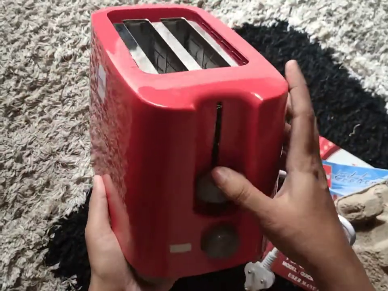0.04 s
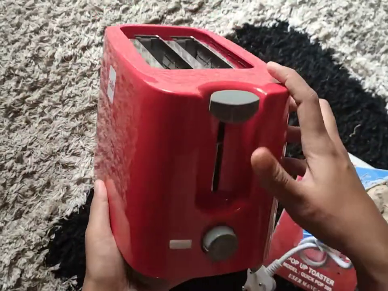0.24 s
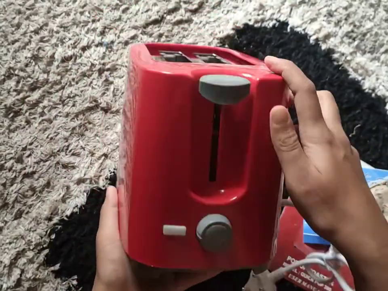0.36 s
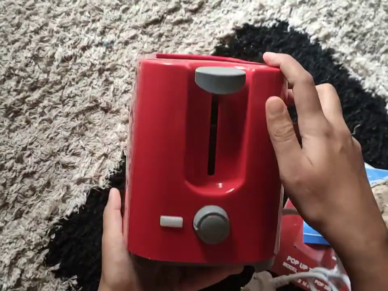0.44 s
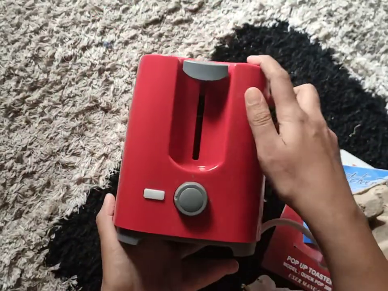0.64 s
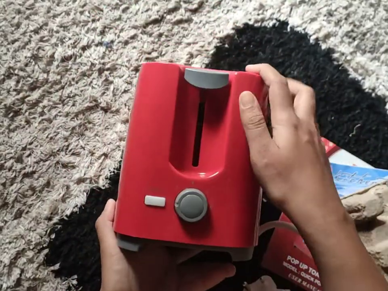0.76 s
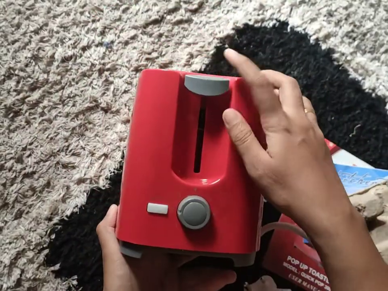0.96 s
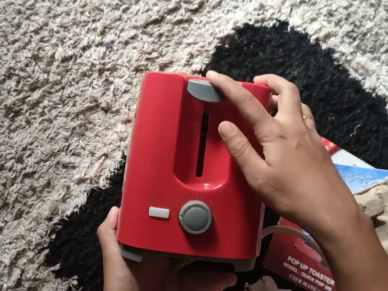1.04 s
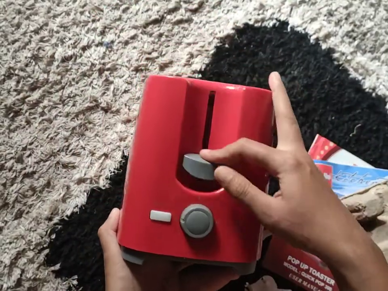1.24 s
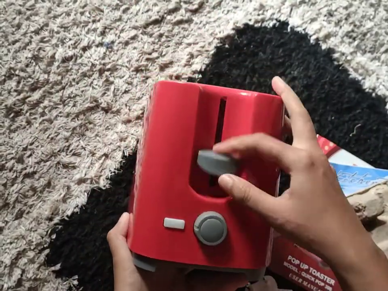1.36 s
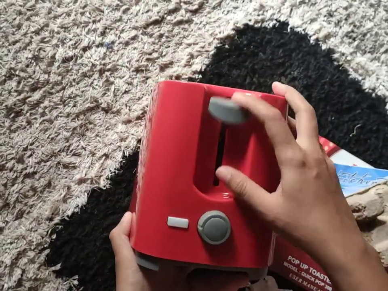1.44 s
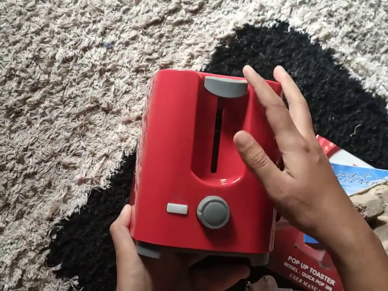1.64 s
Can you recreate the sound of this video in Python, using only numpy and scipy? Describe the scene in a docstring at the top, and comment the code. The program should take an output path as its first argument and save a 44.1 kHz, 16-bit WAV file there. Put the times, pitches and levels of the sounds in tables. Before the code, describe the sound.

A toaster lever snaps up with a sharp clack, then is pushed down with lighter clicks.

```python
"""In a small room, a plastic toaster is handled close by while a fan murmurs in the background.
Its sprung lever is let go and slams into the top stop, is tapped, pushed down onto the steel latch,
and eased back up. Each impact excites the damped modes of the lever, the housing and the steel cage.
Between the stops, friction makes the carriage scrape along its guide and the lever squeak."""
import sys
import numpy as np
from scipy import signal
from scipy.fft import rfft, irfft, next_fast_len
from scipy.io import wavfile
from scipy.ndimage import uniform_filter1d, map_coordinates

SR = 44100
rng = np.random.default_rng(int(sys.argv[2]) if len(sys.argv) > 2 else 0)


def log_audio(samples):
    """Write samples as a 16-bit WAV file to the path given in sys.argv[1]."""
    # one column per channel
    frames = np.atleast_2d(samples).T
    # limit to full scale, then quantise
    limited = np.clip(frames, -1, 1)
    pcm = np.round(limited * 32767).astype(np.int16)
    wavfile.write(sys.argv[1], SR, pcm)


N = 74970

# likeness of left and right (frequency [Hz], correlation [1])
CORRELATION = [(40, 0.13), (130, 0.92), (300, 0.96), (700, 0.78), (1000, 0.46), (1400, 0.066),
               (2500, 0.025), (12000, 0.016)]
# colouring of the two sides (frequency [Hz], left minus right [dB])
BALANCE = [(100, -4), (500, 2), (1200, 0), (2400, -3.5), (4400, -2.5), (6300, -2), (8200, 8), (10500, 10.5),
           (14000, -1)]
# reverberation of the room (frequency [Hz], T60 [s])
ROOM_DECAY = [(150, 0.13), (500, 0.65), (1100, 0.48), (2800, 0.42), (8000, 0.33), (15000, 0.38)]
# tones of the fan (frequency [Hz], level [dB])
FAN_TONES = [(272, -68), (828, -68), (2019, -75)]
# spectra of room air, sliding and impact (frequency [Hz], relative spectral level [dB])
AIR_SPECTRUM = [(15, -81), (25, -19), (75, -19.5), (136, -20.5), (148, -15), (274, -1), (359, -8),
                (445, -9.5), (495, -10.5), (537, -13), (666, -11.5), (826, -8), (1200, -17.5),
                (1300, -12.5), (1900, -17.5), (2230, -13), (2560, -16.5), (2770, -16.5), (4150, -18.5),
                (5730, -23), (9050, -28), (10100, -35.5), (15500, -40.5)]
STEEL_SCRAPE = [(200, -9.5), (1000, -40), (2500, -6), (5600, 2.5), (6900, -8), (8700, 2.5), (9500, -10.5),
                (13000, -11.5), (15000, -10)]
SHELL_RUB = [(100, -66), (280, -0.5), (650, -2), (950, -0.5), (1450, -2.5), (1900, 2), (2700, -1),
             (6000, -15.5), (15000, -51)]
PLASTIC_KNOCK = [(40, -32), (110, -27), (230, -0.5), (400, -3), (480, -1), (570, -3), (690, -8),
                 (1000, -2.5), (1400, -7), (2200, 1.5), (2900, -13), (4000, -8), (5100, -8.5), (9000, -29),
                 (15000, -41)]
STEEL_CLASH = [(200, -23), (1000, -7), (2300, 3), (3300, -0.5), (5500, 5), (7300, 1.5), (8800, 4.5),
               (9500, -5), (12000, -5.5), (15300, -8)]
# modes of guide rod, latch, lever and housing (frequency [Hz], relative level [dB], T60 [s])
GUIDE_MODES = [(915, -6.5, 0.033), (2033, -7, 0.024), (3850, 0, 0.018), (4270, -0.5, 0.015),
               (5420, 1.5, .01), (8570, -8, 0.026)]
LATCH_MODES = [(430, -4, 0.028), (1210, -9, .015), (1610, -4.5, 0.025), (2000, 3, 0.027),
               (2387, -0.5, 0.042), (3280, -7, 0.018), (4420, -19, 0.19), (6400, -8.5, 0.19),
               (8425, -10.5, 0.23), (11213, -10.5, 0.19)]
LEVER_MODES = [(967, -1.5, 0.05), (1083, -1.5, 0.022), (1960, 0.5, 0.017), (2304, 1.5, 0.021)]
HOUSING_MODES = [(204, -32, .1), (285.9, -11.5, 0.27), (406, -18, 0.13), (516.6, -14, 0.24),
                 (568, -7, 0.21), (601.6, -8, 0.16), (894, -7.5, 0.18), (928, -9, 0.23), (1004, -14, 0.16),
                 (1077, -16, 0.14), (1368, -11.5, 0.38), (1627, -15, 0.062), (1778, -17, 0.18),
                 (1925, -11, 0.13), (2170, -11.5, 0.14), (2254, -14, 0.24)]
# modes of the steel cage (frequency [Hz], relative level [dB])
CAGE_MODES = [(2012, -3), (2430, -17), (3074, -2.5), (3537, -4), (4148, -7), (4581, -7), (5112, -7),
              (5733, -5.5), (6045, 0), (6217, -3), (7135, -5), (7429, -8), (7946, -12), (8360, -1.5),
              (8800, 0), (10130, -11), (11780, -8), (12973, -4), (13180, -12), (14553, 2), (15180, -1)]
# squeaks of the pressed lever (centre time [s], half-length [s], frequency [Hz], level [dB])
LEVER_SQUEAKS = [(1.19, 0.055, 956, -54), (1.205, 0.031, 1165, -55), (1.251, 0.022, 955, -45),
                 (1.266, 0.032, 1182, -51), (1.255, .005, 1880, -39), (1.276, 0.01, 1897, -41)]
# strokes of the carriage and brushes of the hand
# (time [s], length [s], scrape [dB], swell [dB], rub [dB], ticks [dB], left minus right [dB])
SLIDES = [(0.0, 0.023, -38.5, -9, -43.5, -61, 0), (0.014, 0.079, -56, -4.5, -58, -61, 4),
          (0.154, 0.08, -49, 8.5, -58.5, -63, -3.5), (0.798, 0.038, -59, -7.5, -55.5, -69, -5),
          (1.002, .03, -58, -11, -50, -59, -6.5), (1.16, 0.058, -56, -6.5, -53, -65, -2.5),
          (1.222, 0.045, -46.5, 1, -44.5, -54, -3.5), (1.292, 0.011, -39, 8, -46.5, -55, -3),
          (1.444, 0.013, -56, 3, -58, -54.5, -5), (1.459, 0.12, -47.5, -1.5, -52.5, -51, -3),
          (1.578, 0.032, -55, -2, -53, -58, 4.5)]
# contacts of the carriage with the latch (time [s], level [dB])
LATCH_HITS = [(1.2996, -29.5), (1.3026, -27.5), (1.3055, -29.5), (1.3121, -33), (1.334, -49)]
# blows of the lever and carriage
# (time [s], knock [dB], housing [dB], steel [dB], left minus right [dB], plastic low-pass [Hz])
IMPACTS = [(0.143, -37, -34, -52, -10, 590), (0.159, -49, -43.5, -44, -12, 9000),
           (0.207, -35, -65, -51, 3, 4000), (0.221, -45, -52, -37, -8, 9000),
           (0.2382, -8.5, -22.5, -25, -1, 14000), (0.2411, -21, -25, -22, -8, 3000),
           (0.2502, -33, -51, -27, 3, 3000), (0.2562, -33, -45, -31.5, 3, 1400),
           (0.2645, -35, -50, -28.5, 9.5, 4000), (0.2727, -18.5, -38, -41, -3, 1400),
           (1.124, -30, -52, -51, -5, 1010), (1.292, -44, -67, -45, -12, 9000),
           (1.2999, -38.5, -62, -25.5, -6, 14000), (1.303, -28, -49, -29, 4.5, 507),
           (1.311, -22.5, -46, -34, 1, 447), (1.333, -51, -46.5, -40, 17, 5000),
           (1.459, -30.5, -48, -42.5, 2, 540), (1.498, -44, -61, -54, -8, 3030),
           (1.529, -41, -46, -52, -3, 2500), (1.547, -36, -60, -45, 0, 900),
           (1.5685, -38, -45.5, -32, -3, 9000), (1.5825, -51, -56, -38, 1.5, 700)]

AIR_DB, RUMBLE_DRIFT_DB, FAN_FLUTTER_DB, FAN_WANDER_RAD = -52.5, 0.5, 2.5, 1.6
SQUEAK_FLUTTER_DB, SQUEAK_JITTER_RAD = 3.5, 1.2
SLIPS_PER_S, CATCHES_PER_S, SLIDE_RISE_S, SLIDE_RELEASE_S = 3900, 330, 0.00052, 0.011
CONTACT_S, ATTACK_S, ROOM_BUILD_S, BUILD_CYCLES = 0.0021, 0.0003, 0.0028, 1.2
KNOCK_T60_S, CLASH_T60_S, CAGE_T60_S, WIRE_T60_S = 0.036, 0.03, 0.27, 0.17
LEVER_DB, CAGE_DB, WIRE_DB, SHOVE_DB = -4, -18, -11, -32  # relative to each blow's levels
WIRE_LO_HZ, WIRE_HI_HZ = 2530, 15290
SHOVE_RISE_S, SHOVE_DELAY_S = 0.0008, 0.0014
WHITEN_HZ, RIPPLE_HZ, LOW_CUT_HZ, TOP_HZ = 207, 140, 190, 15600


def amp(db):
    """Amplitude ratio of a level in decibels."""
    return 10 ** (np.asarray(db) / 20)


def unit_rms(x):
    """Normalisation to an rms of 1."""
    return x / np.sqrt(np.mean(x ** 2) + 1e-20)


def along(points, hz):
    """Interpolation of (frequency, value) points on a logarithmic axis."""
    freqs, values = np.transpose(points)
    return np.interp(np.log(hz + 1), np.log(freqs + 1), values)


def pan(db):
    """Left and right gains for a level difference between the sides."""
    return amp(np.array([[db], [-db]]) / 2)


def wobble(knots_per_s):
    """Smooth random modulation: a spline through Gaussian knots."""
    return map_coordinates(rng.standard_normal(N // 20), [np.arange(N) * knots_per_s / SR], mode="wrap")


def add(track, start_s, sound):
    """Superposition of a sound on the track at a given time."""
    part = track[:, max(round(start_s * SR), 0):][:, :sound.shape[1]]
    part += sound[:, :part.shape[1]]


def filtered(x, response):
    """Linear filtering: the spectrum is multiplied by a frequency response."""
    n = x.shape[-1]
    padded = next_fast_len(n + 4096)
    return irfft(rfft(x, padded) * response(np.fft.rfftfreq(padded, 1 / SR)), padded)[..., :n]


def whiten(x):
    """Spectral whitening levels the broad bumps and leaves the fine ripple."""
    spectrum = rfft(x)
    bins = max(int(WHITEN_HZ * x.shape[-1] / SR), 1)
    power = uniform_filter1d(np.abs(spectrum) ** 2, bins, axis=-1)
    return irfft(spectrum / np.sqrt(np.abs(power) + 1e-12), x.shape[-1])


def half_angle(hz):
    """Half the phase angle whose cosine is the left-right correlation."""
    return np.arccos(np.clip(along(CORRELATION, hz), -1, 1)) / 2


def spread(pair):
    """Mid-side mixing makes two independent signals partly coherent, chiefly in the bass."""
    mid, side = filtered(pair, lambda hz: np.array([np.cos(half_angle(hz)), np.sin(half_angle(hz))]))
    return np.array([mid + side, mid - side])


def coloured(pair, spectrum):
    """Spectral shaping of two noises into a stereo pair of rms 1."""
    return unit_rms(spread(filtered(pair, lambda hz: amp(along(spectrum, hz)))))


def background():
    """Broadband room air with a drifting rumble, and fan tones modulated in level and phase."""
    t, fan = np.arange(N) / SR, np.zeros(N)
    for hz, db in FAN_TONES:
        peak = np.sqrt(2) * amp(db + FAN_FLUTTER_DB * wobble(20.8))
        fan += peak * np.sin(2 * np.pi * hz * t + FAN_WANDER_RAD * wobble(25.85))
    air = amp(AIR_DB) * coloured(rng.standard_normal((2, N)), AIR_SPECTRUM)
    rumble = filtered(air, lambda hz: hz < 170)
    return air + rumble * (amp(RUMBLE_DRIFT_DB * wobble(10.93)) - 1) + fan


def room(x, wet_db):
    """Reverberation: a diffuse tail builds up behind the direct sound and decays band by band."""
    hz, t, noise = signal.stft(spread(rng.standard_normal((2, SR // 2))), SR, nperseg=256)
    envelope = amp(-60 * t / along(ROOM_DECAY, hz)[:, None]) * (1 - np.exp(-t / ROOM_BUILD_S))
    tail = signal.istft(noise * envelope, SR, nperseg=256)[1]
    tail = whiten(np.pad(tail, ((0, 0), (0, SR // 4))))[:, :SR // 2]
    reverb = signal.fftconvolve(x, tail / np.linalg.norm(tail[0]), axes=1)[:, :x.shape[1]]
    return x + amp(wet_db) * reverb


def shell_ripple(hz):
    """Interference of reflections in the shell: blunt peaks and deep dips, different on each side."""
    knots = rng.standard_normal((2, SR // 20))
    pattern = np.array([map_coordinates(k, [hz / RIPPLE_HZ], mode="wrap") for k in knots])
    depth_db = 5 * np.clip(hz / 4000, 0, 1)
    gain = amp(depth_db * np.minimum(pattern, np.tanh(pattern)))
    return gain / np.sqrt(uniform_filter1d(gain ** 2, size=2000, axis=1))


def ring(modes, t):
    """Damped modes build up and decay exponentially; the higher ones reach the sides out of phase."""
    out = np.zeros((2, len(t)))
    for hz, db, t60 in modes:
        phase, skew, scatter_db = rng.standard_normal(3)
        offset = np.sign(skew) * half_angle(hz)
        envelope = amp(db + scatter_db - 60 * t / t60) * (1 - np.exp(-t * hz / BUILD_CYCLES))
        out += envelope * np.sin(2 * np.pi * (hz * t + phase) + np.array([[offset], [-offset]]))
    return out


def squeaks():
    """Stick-slip oscillation of the pressed lever in its slot gives brief, unsteady tones."""
    t, out = np.arange(N) / SR, np.zeros(N)
    for centre, half_length, hz, db in LEVER_SQUEAKS:
        swell = amp(db + SQUEAK_FLUTTER_DB * wobble(200)) * np.exp(-((t - centre) / half_length) ** 2)
        out += swell * np.sin(2 * np.pi * hz * t + SQUEAK_JITTER_RAD * wobble(170))
    return room(out * pan(-2.8), wet_db=-4.5)


def impulses(channels, per_s):
    """Shot noise: impulses of random size at random times."""
    return rng.standard_normal((channels, N)) * (rng.random(N) < per_s / SR)


def sliding():
    """Sliding friction: tiny slips hiss in the steel and rub in the shell; catches ring the guide."""
    t, out = np.arange(N) / SR, np.zeros((2, N))
    scrape = coloured(impulses(2, SLIPS_PER_S), STEEL_SCRAPE)
    rub = coloured(impulses(2, SLIPS_PER_S), SHELL_RUB)
    catches = impulses(1, CATCHES_PER_S)
    ticks = unit_rms(signal.fftconvolve(catches, ring(GUIDE_MODES, t[:SR // 10]), axes=1)[:, :N])
    for start, length, scrape_db, swell_db, rub_db, tick_db, side_db in SLIDES:
        age = t - start
        gate = np.clip(age / SLIDE_RISE_S, 0, 1) * np.exp(-np.maximum(age - length, 0) / SLIDE_RELEASE_S)
        swell = amp(swell_db * np.clip(age / length, 0, 1))
        friction = amp(scrape_db) * scrape + amp(rub_db) * rub + amp(tick_db) * ticks
        out += gate * swell * pan(side_db) * friction
    return room(out * amp(0.35 * wobble(90)), wet_db=-3.5)


def latch():
    """Contact chatter: each touch of the carriage excites the bright modes of the steel latch."""
    out, t = np.zeros((2, N)), np.arange(SR // 2) / SR
    for start, db in LATCH_HITS:
        add(out, start, amp(db) * pan(1) * ring(LATCH_MODES, t))
    return out


def shove():
    """Rigid-body radiation: the toaster jumps just after each blow and pushes the air once."""
    out, u = np.zeros((2, N)), np.arange(SR // 10) / SR / SHOVE_RISE_S
    pulse = pan(0) * u * (2 - u / 2) * np.exp(-u)
    for start, knock_db, *_ in IMPACTS:
        add(out, start + SHOVE_DELAY_S, amp(knock_db + SHOVE_DB) * pulse)
    return out


def wires(pitches, t):
    """Free vibration of the cage's thin wires and tabs: the same pitches at each blow, in a new mix."""
    lines = np.zeros((2, len(t) // 2 + 1), complex)
    real, imag = rng.standard_normal((2, 2, len(pitches)))
    lines[:, (pitches * len(t) / SR).astype(int)] = (real + 1j * imag) * amp(along(STEEL_CLASH, pitches))
    return unit_rms(irfft(lines, len(t))) * amp(-60 * t / WIRE_T60_S)


def burst(spectrum, t60, t):
    """Modal overlap: heavily damped modes merge into noise that dies quickly after the contact."""
    attack = 1 - np.exp(-t / ATTACK_S)
    envelope = amp(-60 * np.maximum(t - CONTACT_S, 0) / t60) * attack
    white = whiten(spread(rng.standard_normal((2, len(t)))) * envelope)
    sound = filtered(white, lambda hz: amp(along(spectrum, hz))) * (t < 2 * t60) * attack
    return unit_rms(sound) * np.sqrt(np.mean(envelope ** 2))


def blows():
    """Impact excitation of lever, housing and cage; a softer contact low-passes the plastic's sound."""
    out, t = np.zeros((2, N)), np.arange(SR // 2) / SR
    wire_pitches = rng.uniform(WIRE_LO_HZ, WIRE_HI_HZ, size=110)
    cage = [(hz, db, CAGE_T60_S) for hz, db in CAGE_MODES]
    for start, knock_db, housing_db, steel_db, side_db, cutoff_hz in IMPACTS:
        knock = amp(-7) * room(burst(PLASTIC_KNOCK, KNOCK_T60_S, t), wet_db=-8)
        lever = knock + amp(LEVER_DB) * ring(LEVER_MODES, t)
        clash = room(burst(STEEL_CLASH, CLASH_T60_S, t), wet_db=-4)
        steel = clash + amp(CAGE_DB) * ring(cage, t) + amp(WIRE_DB) * wires(wire_pitches, t)
        plastic = pan(side_db) * amp(knock_db) * lever + amp(housing_db) * ring(HOUSING_MODES, t)
        softness = signal.butter(2, cutoff_hz, fs=SR, output="sos")
        add(out, start, signal.sosfilt(softness, plastic) + pan(side_db) * amp(steel_db) * steel)
    return out


def scene():
    """Superposition of the background and the toaster, thin in the bass and coloured on each side."""
    low_cut = signal.butter(2, LOW_CUT_HZ, "high", fs=SR, output="sos")
    toaster = signal.sosfilt(low_cut, blows() + latch() + sliding() + squeaks())
    balance = lambda hz: amp(np.array([along(BALANCE, hz), -along(BALANCE, hz)]) / 2)
    toaster = filtered(toaster, lambda hz: balance(hz) * shell_ripple(hz))
    return toaster + shove() + background()


def record(dry):
    """Band limiting: a steep low-pass removes the highest treble."""
    return filtered(dry, lambda hz: 1 / (1 + (hz / TOP_HZ) ** 200))


dry = scene()
out = record(dry)
log_audio(out)
```